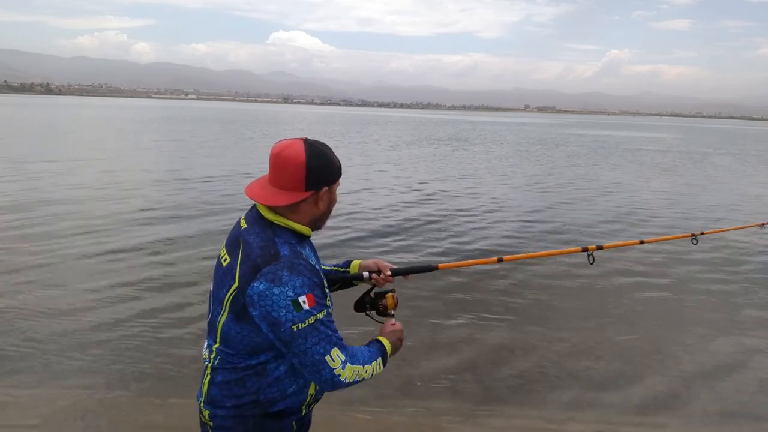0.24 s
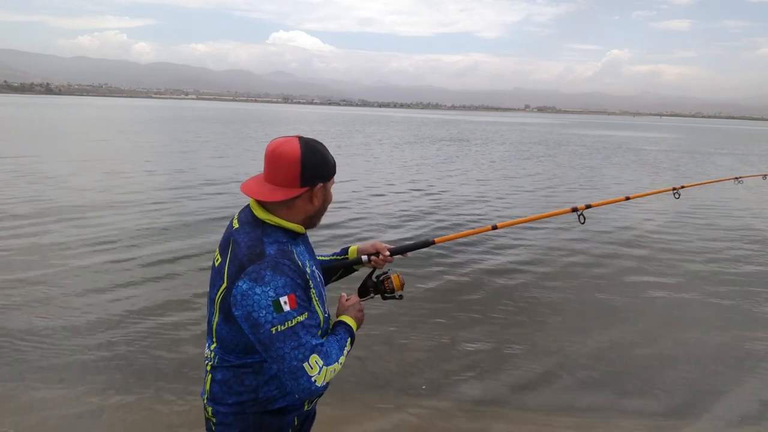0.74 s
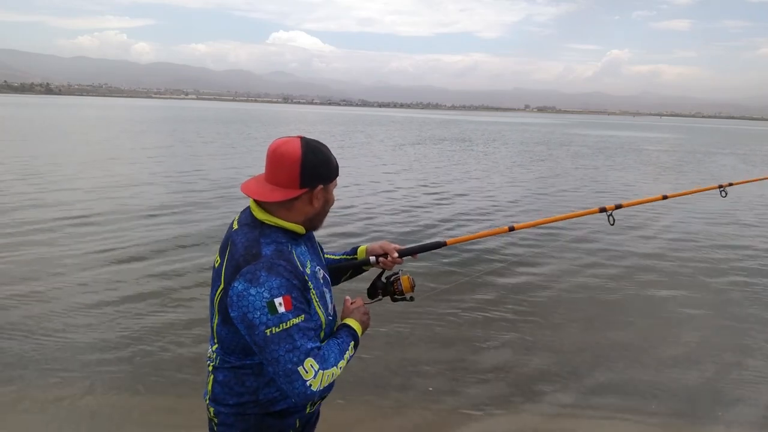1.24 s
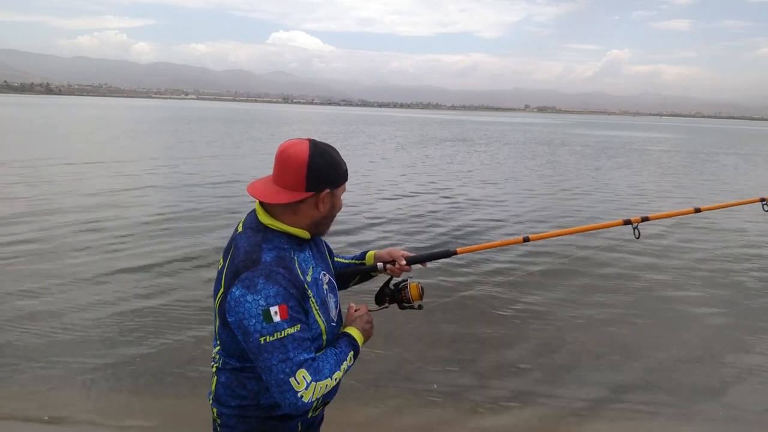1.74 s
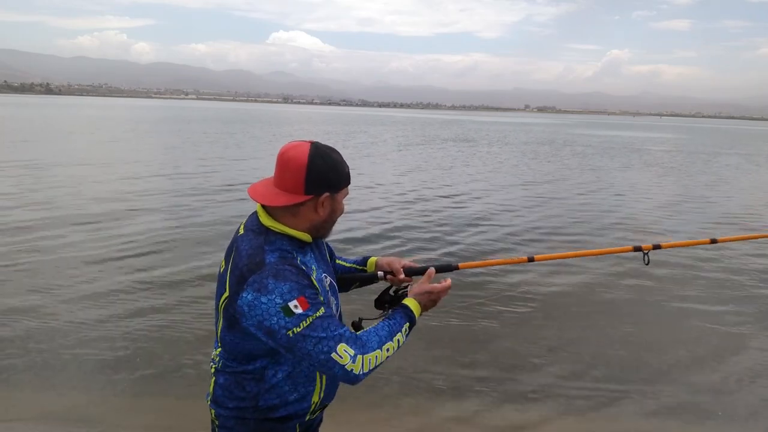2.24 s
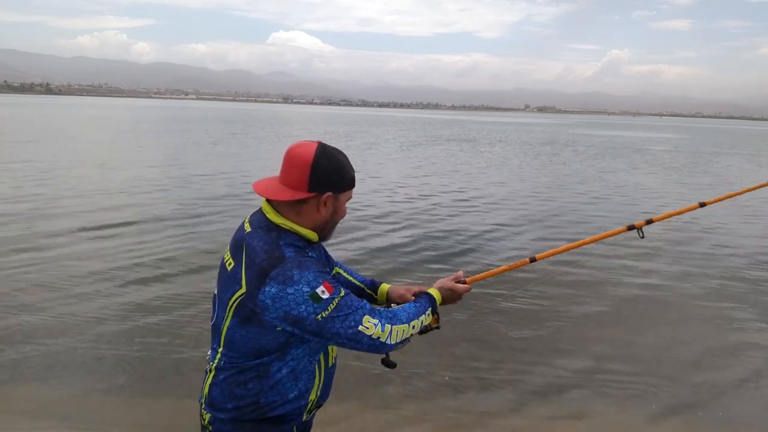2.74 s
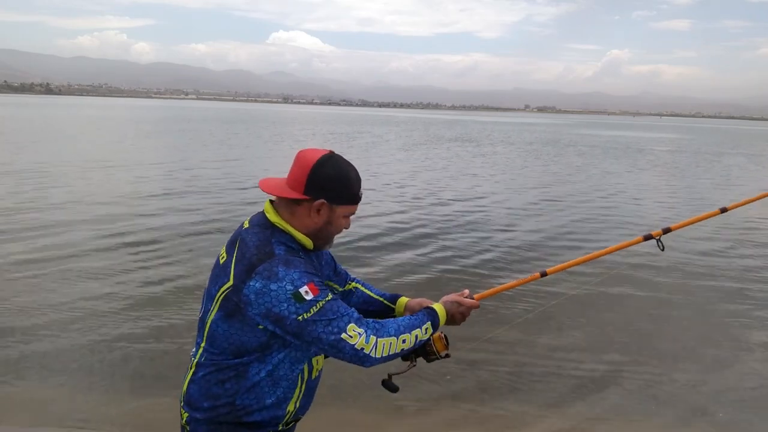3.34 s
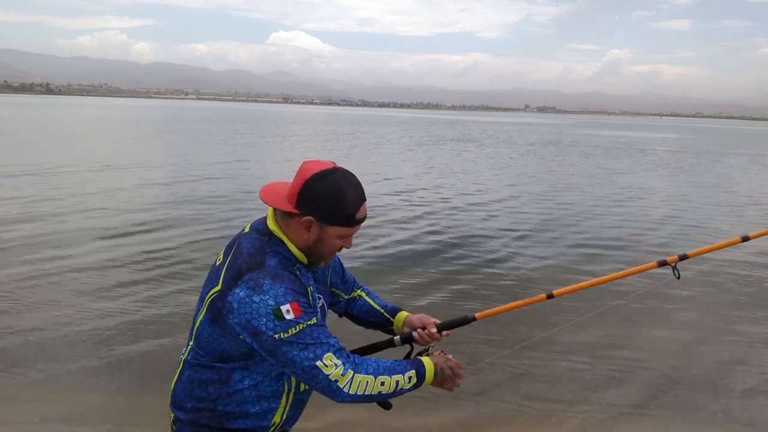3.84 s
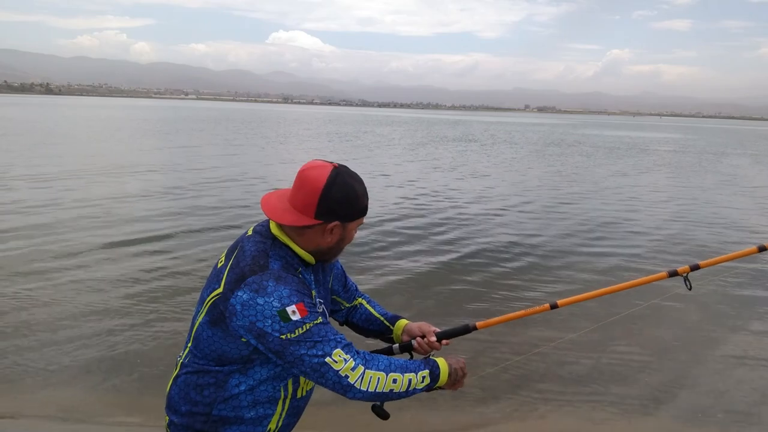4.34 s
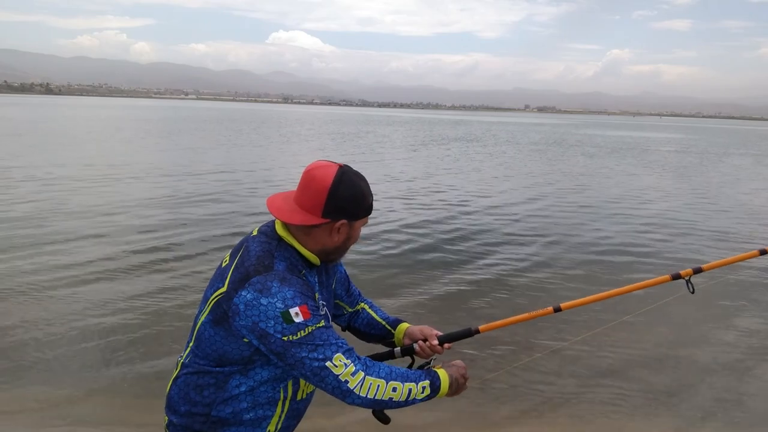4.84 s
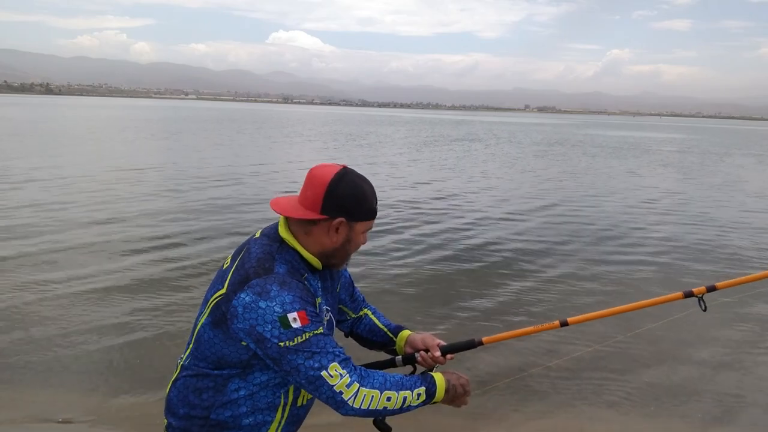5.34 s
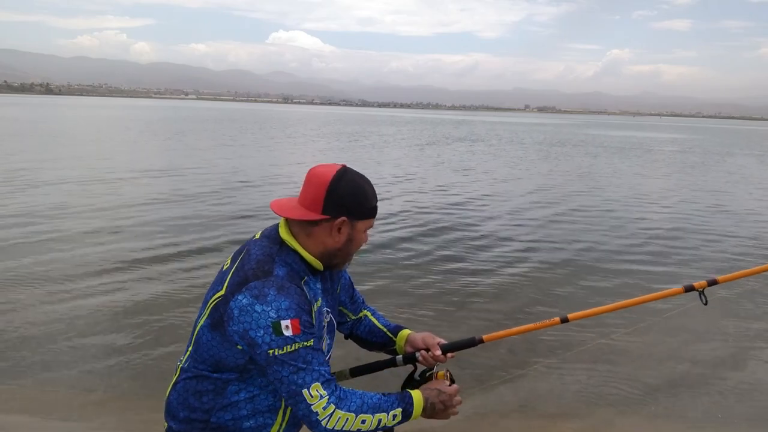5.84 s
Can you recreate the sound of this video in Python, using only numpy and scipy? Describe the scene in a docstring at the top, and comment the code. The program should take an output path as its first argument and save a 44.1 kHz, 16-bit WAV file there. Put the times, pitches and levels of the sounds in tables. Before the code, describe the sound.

Outdoors at a calm sandy shore, microphone close to the water and an angler. A reedy, hissing whirr of braided line through rod rings pulses and rattles for half a second and stops. Small wavelets then fizz, spit and plop, strongest in the first three seconds, and thin to a dribble. Later a reel ratchet clicks in short quick runs, while low wind thumps bump the microphone.

```python
"""A calm sandy shore, the microphone close to an angler and the water's edge, in light wind.
He winds in for half a second: the ridges of the braided line whirr, hiss and rattle in the rod rings.
Wavelets then fizz, spit and plop on the sand and fade to a dribble: swarms of ringing bubbles, noisy
ticks and gliding hollows. The reel's ratchet clicks in three short runs of struck, damped tones.
Wind is low noise with short thumps on the microphone, over the steady noise of distant water and open air."""
import sys
import numpy as np
from scipy import signal
from scipy.fft import rfft, irfft, next_fast_len
from scipy.io import wavfile
from scipy.ndimage import uniform_filter1d, map_coordinates

SR = 44100
rng = np.random.default_rng(int(sys.argv[2]) if len(sys.argv) > 2 else 0)


def persist_wave(psi):
    """Save psi, clipped to +-1, as 16-bit WAV."""
    counts = np.round(np.clip(psi, -1, 1) * 32767).astype(np.int16)
    wavfile.write(sys.argv[1], SR, np.atleast_2d(counts).T)


N = 268252  # length in samples

# spectrum of bubbles bursting at the water's edge: freq_hz, gain_db
SHORE_SPECTRUM = [(150, -42), (250, -11), (400, -29.5), (680, -14.5), (988, -4), (1330, 2.5), (2240, -4.5),
                  (5730, -7.5), (9660, -13.5), (16000, -21.5)]
WINDING_STOP_S, SLACK_S = .49, 0.57  # the winding ends, then the line goes slack


def amp(db):
    """Decibels to gain."""
    return 10 ** (np.asarray(db) / 20)


def unit(x):
    """Scale to rms 1."""
    return x / np.sqrt(np.mean(x ** 2) + 1e-20)


def curves(rows):
    """One value per sample for each column after the time."""
    s, *cols = np.transpose(rows)
    return [np.interp(np.arange(N) / SR, s, c) for c in cols]


def wobble(rate):
    """A smooth random curve, rate knots a second."""
    knots = rng.standard_normal(int(N * rate / SR) + 4)
    return map_coordinates(knots, [np.arange(N) * rate / SR])


def filtered(x, response):
    """x times a response of frequency."""
    m = next_fast_len(len(x) + 8192)  # padded so that the end does not wrap into the start
    return irfft(rfft(x, m) * response(np.fft.rfftfreq(m, 1 / SR)), m)[:len(x)]


def colour(x, points):
    """Shape x with (freq_hz, gain_db) points on a log frequency axis."""
    f, db = np.transpose(points)
    return filtered(x, lambda hz: amp(np.interp(np.log(hz + 1), np.log(f), db)))


def band(x, lo_hz, hi_hz, order=2):
    """Causal band-pass."""
    sos = signal.butter(order, [lo_hz, min(hi_hz, .49 * SR)], "band", fs=SR, output="sos")
    return signal.sosfilt(sos, x)


def add(track, s, sound):
    """Mix a sound into the track at time s."""
    part = track[max(round(s * SR), 0):][:len(sound)]
    part += sound[:len(part)]


def patchy(x, depth_db):
    """Random gain in clusters a few hundred Hz wide and a few hundredths of a second long."""
    z = signal.stft(x, nperseg=512)[2]
    rows = np.sqrt(np.arange(z.shape[0])) * 3.5  # patches widen toward the treble
    cols = np.arange(z.shape[1]) / 5
    field = map_coordinates(rng.standard_normal((60, 400)), np.meshgrid(rows, cols, indexing="ij"))
    return signal.istft(z * amp(depth_db * field), nperseg=512)[1][:N]


def bubble(t, hz, cycles, rise):
    """A ringing air pocket swells softly, decays by 1/e in so many cycles and glides by the share rise."""
    age = t * hz / cycles
    phase = cycles * (age + rise * (age - 2 * (1 - np.exp(-age / 2))))
    return np.sin(2 * np.pi * phase) * np.exp(-age) * (1 - np.exp(-3.5 * age))


def winding():
    """Pitch and level of the line: each turn of the slowing rotor tugs it, until the winding stops."""
    # mean speed of the line, as braid ridges passing a ring: time_s, ridge_rate_hz
    line_speed = [(0, 2333), (.12, 2104), (.18, 1598), (.225, 1684), (.275, 1908), (.32, 1622), (.42, 1552),
                  (.46, 1840), (.5, 1468)]
    rotor_hz, slowing_hz_per_s, first_pull_s = 16.2, 8.8, 0.005
    pull_share = 0.0964  # swing of speed within a turn
    line_db, stop_db_per_s = -43.5, 163
    t = np.arange(N) / SR
    (mean_hz,) = curves(line_speed)
    age = t - first_pull_s
    pull = np.cos(2 * np.pi * (rotor_hz * age - slowing_hz_per_s * age ** 2 / 2))
    level_db = line_db - stop_db_per_s * np.maximum(t - WINDING_STOP_S, 0)
    return mean_hz * (1 + pull_share * pull), level_db


def braid(hz):
    """Ridges strike a ring at an uneven rate; the higher the overtone, the more it smears."""
    # overtones of the passing ridges: harmonic_number, level_db
    overtones = [(1, 8), (2, -5), (3, -5.5), (4, -9)]
    slip_share, flutter_db = 0.0143, 3  # the braid slips unevenly and keeps losing touch with the rings
    speed = 1 + slip_share * wobble(1500) + .008 * wobble(120)
    phase = 2 * np.pi * np.cumsum(hz * speed) / SR
    return sum(amp(level + flutter_db * wobble(109.6)) * np.sin(k * phase) for k, level in overtones)


def fishing_line():
    """Braid ridges whirr through the rings' resonances over a scratchy hiss; the line sticks once."""
    # resonances of the rod rings: freq_hz, gain_db
    ring_spectrum = [(800, -21), (1500, -13), (2150, -3.5), (2650, -9), (3350, 10.5), (3800, -6.5),
                     (4300, 7), (4850, -5.5), (5350, 5), (6600, -3), (7400, -4), (9500, -18.5),
                     (16000, -27)]
    # friction of the line: freq_hz, gain_db
    rasp_spectrum = [(200, -52), (400, -14.5), (650, -25), (1100, -4.5), (2400, -3), (6000, -6.5),
                     (12000, -25), (16000, -39)]
    # the line snatches and rattles in the rings: middle_s, level_db, half_length_s
    snatches = [(0.301, -40, 0.0069), (.381, -39, 0.011), (0.403, -34.5, 0.0087)]
    whirr_db, hiss_db = -1.5, -2.5  # relative to the level of the winding
    catch_s, catch_half_s, catch_hz, catch_db = 0.3913, 0.026, 1014, -43  # it squeaks on a low note

    hz, db = winding()
    t = np.arange(N) / SR
    taut = np.clip((SLACK_S - t) / (SLACK_S - WINDING_STOP_S), 0, 1)
    whirr = unit(colour(taut * braid(hz), ring_spectrum))
    whirr = whirr * np.sqrt(SLACK_S * SR / N)  # about unit level while the line is taut
    scratch = patchy(rng.standard_normal(N), depth_db=3.5) * amp(3.2 * wobble(500))
    hiss = unit(colour(scratch, rasp_spectrum))
    # the whirr drops out for about twice as long as the squeak
    stuck = np.exp(-((t - catch_s - catch_half_s / 2) / (2 * catch_half_s)) ** 8)
    running = amp(db) * (amp(whirr_db) * (1 - stuck) * whirr + amp(hiss_db) * hiss)

    squeak_phase = 2 * np.pi * catch_hz * np.cumsum(1 + .03 * wobble(700)) / SR
    squeak_gate = np.exp(-((t - catch_s) / catch_half_s) ** 8)
    squeak = squeak_gate * amp(2 * wobble(150)) * np.sin(squeak_phase)

    swells = sum(amp(level) * np.exp(-((t - s) / length) ** 2) for s, level, length in snatches)
    rattle = unit(colour(rng.standard_normal(N), ring_spectrum)) * swells
    return running + amp(catch_db) * squeak + rattle


def wind():
    """A low rumble on the microphone; single eddies shake it for a few uneven swings."""
    # rumble, raised by 3.5 dB below: time_s, level_db
    rumble_level = [(0, -66.5), (5, -67.5), (5.4, -62.5), (6.08, -70)]
    # spectrum of the rumble: freq_hz, gain_db
    rumble_spectrum = [(20, -41), (56, 1), (117, -1.5), (242, -19.5), (500, -79)]
    # eddies that hit the microphone: middle_s, level_db, half_length_s
    thumps = [(0.745, -44, 0.015), (0.837, -38, 0.043), (1.389, -47, 0.01), (2.437, -46.5, 0.057),
              (4.89, -43, 0.014), (5.223, -40, 0.011), (5.314, -38.5, 0.026), (5.458, -48.5, 0.035),
              (5.626, -52.5, 0.12)]
    thump_hz = 79.9  # centre pitch of every thump, before the random drift
    (db,) = curves(rumble_level)
    out = amp(db + 3.5) * unit(colour(rng.standard_normal(N), rumble_spectrum))
    t = np.arange(N) / SR
    flutter = 0.2 * unit(band(rng.standard_normal(N), 78, 136.0))
    drift = 1.56 * wobble(60)  # phase in radians
    for s, level_db, length in thumps:
        swell = np.exp(-((t - s) / length) ** 2)
        swing = np.cos(2 * np.pi * thump_hz * (t - s) + drift)
        out = out + amp(level_db) * swell * (swing + flutter)
    return colour(out, [(20, -23), (50, 0)])  # the microphone is deaf to the slowest pressure swings


def open_air():
    """Distant water and open air: steady shaped noise."""
    # spectrum of the background: freq_hz, gain_db
    air_spectrum = [(100, 3.5), (250, 5.5), (500, -1), (1100, -12), (5000, -20), (12000, -17.5),
                    (14000, -24)]
    return amp(-77.0) * unit(colour(rng.standard_normal(N), air_spectrum))


def wavelets():
    """Levels in dB of splash and of spray: all wavelets share one shape, and their powers add."""
    # wavelets that break on the sand: crest_s, running_length_s, splash_db, fine_spray_db
    breakers = [(0.692, 0.07, -73, -72.5), (0.927, 0.12, -67, -71), (1.036, 0.08, -58.5, -69.5),
                (1.141, 0.14, -60.5, -62), (1.579, 0.24, -50.5, -61.5), (1.883, 0.31, -59.5, -57.5),
                (2.035, 0.16, -57.5, -60), (2.29, 0.062, -63, -67), (2.476, 0.2, -61, -57.5),
                (2.72, 0.084, -53, -62), (2.81, 0.055, -45.5, -63.5), (2.915, 0.15, -50, -72.5),
                (3.756, 0.022, -71, -64.5), (3.836, 0.041, -65, -96), (3.982, 0.22, -67, -72),
                (4.324, 0.14, -65, -63.5), (4.503, 0.038, -76, -59), (4.582, 0.19, -57, -58.5),
                (4.878, 0.26, -69.5, -60.5), (5.174, 0.18, -65.5, -62.5), (5.617, 0.15, -72, -68.5),
                (5.801, 0.056, -65.5, -74.5)]
    rise_db_per_s, sag_db_per_s = 299, 25  # a wavelet builds, then runs up the sand
    drain_db_per_s = 213  # added to the sag as it sinks away
    trickle_db, seep_db = -81, -85  # splash and spray between wavelets
    spray_lag_s = 0.0018  # the fine spray follows the splash

    def shape_db(age, length):
        """Rise before the crest, slow sag after it, steep drain at the end of the run."""
        rise = -rise_db_per_s * np.maximum(-age, 0)
        sag = -sag_db_per_s * np.maximum(age, 0)
        return rise + sag - drain_db_per_s * np.maximum(age - length, 0)

    t = np.arange(N) / SR
    splash, spray = amp(trickle_db) ** 2, amp(seep_db) ** 2
    for s, length, splash_db, spray_db in breakers:
        splash = splash + amp(splash_db + shape_db(t - s, length)) ** 2
        spray = spray + amp(spray_db + shape_db(t - s - spray_lag_s, length)) ** 2
    return 10 * np.log10(splash), 10 * np.log10(spray)


def froth(lo_hz, hi_hz, cycles, spread_db, smooth, patchy_db, count, size):
    """A swarm of bubbles between two pitches, on a noise bed of unresolved ones; rms 1."""
    start, pitch, life, strength, glide = rng.random((count, 5)).T[:, :, None]
    hz = lo_hz * (hi_hz / lo_hz) ** pitch
    gain = amp(spread_db * np.minimum(-np.log(1 - strength), 3))  # many weak, a few strong
    can_glide = hi_hz < SR / 8  # the finest spray bursts before it can glide
    rise = 0.082 / cycles * (glide - .4) * can_glide
    grains = gain * bubble(np.arange(size) / SR, hz, cycles * 2 ** (2 * life - 1), rise)
    places = (start * N).astype(int) + np.arange(size)
    swarm = np.bincount(places.ravel(), grains.ravel(), N)[:N]
    bed = band(rng.standard_normal(N), lo_hz, hi_hz, order=4)
    mix = unit(colour(patchy(unit(swarm) + smooth * unit(bed), patchy_db), SHORE_SPECTRUM))
    power = np.abs(uniform_filter1d(mix ** 2, SR // 16))
    return unit(mix / np.sqrt(power + 0.075))  # every stretch holds about as much air


def crackle(count, size):
    """The finest bubbles burst without ringing: a dense patter of broad ticks; rms 1."""
    strengths = amp(13.4 * rng.standard_normal(count).clip(-2, 2))
    ticks = np.bincount(rng.integers(N, size=count), strengths, N)
    envelope = signal.fftconvolve(ticks, np.hanning(2 * size)[size:] ** 2)[:N]
    noise = patchy(envelope * rng.standard_normal(N), depth_db=8)
    return unit(colour(band(noise, 2020, 10000), SHORE_SPECTRUM))


def wash():
    """Weak ripples dribble a few bubbles; stronger wavelets churn up dense froth, gurgle and spray."""
    deep_db, deep_grows_db = -17.5, 2.5  # deep gurgle under the splash; its gain in a dense froth
    crackle_db = -2.5  # bursting ticks over ringing fizz in the spray
    clump_db, clumps_per_s = 3.5, 37  # a thin dribble comes in little spurts
    splash_db, spray_db = wavelets()
    churn = np.clip((splash_db + 67.5) / 14, .03, 1)  # share of dense froth
    dense = froth(761.0, 2986, cycles=4.9, spread_db=4.0, smooth=0.85, patchy_db=4.5, count=10000, size=1000)
    dribble = froth(699.5, 2706, cycles=9.5, spread_db=7, smooth=0.057, patchy_db=8.5, count=1400, size=2000)
    deep = froth(325, 802, cycles=3.5, spread_db=8, smooth=0.11, patchy_db=9.0, count=700, size=1800)
    fizz = froth(2700, 12500, cycles=11, spread_db=5, smooth=.1, patchy_db=6, count=7000, size=500)
    splash = np.sqrt(churn) * dense + np.sqrt(1 - churn) * dribble
    splash = splash + amp(deep_db + deep_grows_db * churn) * deep
    spray = unit(fizz + amp(crackle_db) * crackle(count=1200, size=130))
    spurts = amp(clump_db * (1 - churn) * wobble(clumps_per_s))
    return spurts * (amp(splash_db) * splash + amp(spray_db) * spray)


def gurgles():
    """A hollow in the surface closes: its noisy resonance swells and glides upward."""
    # closing hollows: middle_s, pitch_hz (at the middle, before the random wobble), level_db
    hollows = [(0.04, 432, -62), (0.09, 1273, -58.5), (0.41, 419.5, -61.5), (1.541, 804, -59.5),
               (1.72, 387.6, -58), (1.977, 622, -60), (2.108, 461, -59), (2.241, 2080, -58.5),
               (2.32, 900, -65.5), (2.541, 1149, -52), (2.75, 720, -56), (3.5, 690, -62), (3.65, 950, -64),
               (3.989, 1360, -65.5), (4.046, 1940, -59), (5.009, 1261, -58), (5.28, 700, -63.5),
               (6.02, 786, -66)]
    out, t = np.zeros(N), np.arange(-SR // 12, SR // 12) / SR
    for s, hz, db in hollows:
        pitch = hz * np.exp(2.0 * t + 0.0626 * wobble(412.6)[:len(t)])
        swell = np.exp(-(t / 0.027) ** 2)
        add(out, s + t[0], amp(db) * swell * np.sin(2 * np.pi * np.cumsum(pitch) / SR))
    return out


def plops():
    """Larger pockets of air close and ring low, wavering as the water moves over them."""
    # large bubbles, started 2 % lower and 6.5 dB up below: start_s, level_db, pitch_hz
    pockets = [(0.083, -53, 540), (0.611, -50, 1340), (1.081, -47.5, 1170), (1.131, -37.5, 1027),
               (1.271, -58, 550), (1.619, -51.5, 396), (1.668, -51, 402.6), (2.03, -46, 645),
               (2.196, -53, 586), (2.818, -45.5, 482), (3.463, -54, 634), (4.101, -52, 924),
               (4.406, -44, 1060), (4.573, -55, 417), (5.164, -55.5, 986), (5.819, -50, 1182)]
    out, t = np.zeros(N), np.arange(SR // 8) / SR
    for s, db, hz in pockets:
        wavering_s = np.cumsum(1 + 0.085 * wobble(130)[:len(t)]) / SR  # time runs unevenly
        add(out, s, amp(db + 6.5) * bubble(np.abs(wavering_s), hz * .98, cycles=8.7, rise=0.11))
    return out


def drops():
    """A drop is a short noisy spit with a soft tail of falling droplets, and a small ringing bubble."""
    # loudest drops and bursting bubbles, lowered 6.5 dB below: start_s, level_db, pitch_hz
    loud_drops = [(0.733, -39.5, 3390), (0.8936, -44, 3130), (1.0121, -39.5, 1696), (1.046, -34, 3290),
                  (1.0813, -35, 3600), (1.106, -39.5, 1810), (1.147, -36.5, 1910), (1.211, -29.5, 3360),
                  (1.225, -36.5, 5350), (1.2345, -37, 4630), (1.5712, -33, 2920), (1.7178, -33, 3310),
                  (1.812, -38.5, 1920), (1.936, -46, 2590), (2.4768, -33, 4120), (2.805, -30.5, 1436),
                  (2.852, -26.5, 3330), (2.8596, -28, 1700), (2.861, -32, 5720), (3.052, -31.5, 3480),
                  (3.482, -36.5, 5680), (3.701, -35.5, 5620), (3.7558, -41.5, 4100), (4.1005, -42, 1470),
                  (4.277, -42, 6600), (4.324, -37.5, 6160), (4.403, -38.5, 2670), (4.495, -32.5, 3070),
                  (4.4995, -34, 5220), (4.591, -33, 1700), (5.188, -49.5, 3140), (5.272, -40, 3340),
                  (5.8187, -37, 3200), (5.8543, -41, 2890)]
    out, t = np.zeros(N), np.arange(SR // 12) / SR
    for s, db, hz in loud_drops:
        patter = amp(-9.5 - 60 * t / 0.12 + 1.7 * wobble(560)[:len(t)])
        envelope = amp(-60 * t / 0.012) + patter
        spit = band(rng.standard_normal(len(t)) * envelope, hz * 0.56, hz * 1.39, order=4)
        drop = spit / np.abs(spit).max() + 2.74 * bubble(t, hz, cycles=6.55, rise=0.0049)
        drop = band(drop, hz * 0.19, hz * 1.4, order=3)  # the soft surface rounds off the attack
        add(out, s, amp(db - 6.5) * drop / np.abs(drop).max())
    return out


def spits():
    """A thin film of water snaps: a sharp tick of noise with no ring."""
    # snapping films: start_s, peak_db
    films = [(1.147, -42), (1.213, -37.5), (1.64, -40), (1.813, -40), (2.063, -39.5), (2.087, -45),
             (2.124, -44), (2.143, -37), (2.452, -41), (2.52, -40), (2.589, -37.5), (2.625, -39.5),
             (2.805, -35.5)]
    t60_s, low_hz, high_hz = 0.023, 2070, 6300  # all ticks die alike and share one band
    out, t = np.zeros(N), np.arange(SR // 50) / SR
    for s, db in films:
        tick = band(rng.standard_normal(len(t)) * amp(-60 * t / t60_s), low_hz, high_hz, order=3)
        add(out, s, amp(db) * tick / np.abs(tick).max())
    return out


def reel():
    """The pawl snaps off each ratchet tooth, rings, and strikes again more softly."""
    # teeth slipping as the hand turns the reel: start_s, first_blow_peak_db
    teeth = [(4.5995, -31), (4.6203, -31.5), (4.6415, -31.5), (4.671, -30), (4.888, -32.5), (4.9055, -29.5),
             (4.921, -29.5), (4.9375, -28), (5.2734, -42), (5.3272, -41)]
    # ringing modes of the pawl: freq_hz, level_db, t60_s
    pawl_modes = [(2420, -10, 0.02), (4130, -11, 0.011), (5230, 1.5, 0.0072), (5860, -3, 0.012),
                  (6570, 2.5, 0.0077), (7480, -8, 0.016), (10200, -5, 0.0062), (11760, -4.5, 0.0034)]
    rebound_s, rebound_db = 0.0044, -4.5
    out, t = np.zeros(N), np.arange(SR // 25) / SR
    for s, db in teeth:
        for delay, blow_db in [(0, 0), (rebound_s, rebound_db)]:
            ring = 0
            for hz, level, t60 in pawl_modes:
                decay = amp(level + rng.normal(0, 2.1) - 60 * t / t60)  # no two blows alike
                ring = ring + decay * np.sin(2 * np.pi * (hz * t + rng.random()))
            scrape = .5 * rng.standard_normal(len(t)) * amp(-60 * t / 0.012)
            click = band(ring + scrape, 2680, 22000, order=3)  # so small a part gives no bass
            add(out, s + delay, amp(db + blow_db) * click / np.abs(click).max())
    return out


def scatter(x):
    """A faint, short answer from the beach and the angler's body: a decaying noise tail."""
    t = np.arange(SR // 4) / SR
    tail = band(rng.standard_normal(len(t)), 340, 15800) * amp(-60 * t / 0.36) * (t > .003)
    return signal.fftconvolve(x, tail / np.linalg.norm(tail))[:N]


def scene():
    """Water and tackle close by, over open air and wind."""
    water = wash() + spits() + drops() + plops() + gurgles()
    clicks = reel()
    answer = scatter(amp(-10) * water + amp(-16.5) * clicks)
    return (water + clicks + answer + fishing_line() + wind() + open_air())[None]


def record(dry):
    """The recorder keeps nothing above its band limit."""
    top_hz = 15900
    return np.array([filtered(x, lambda hz: hz < top_hz) for x in dry])


dry = scene()
out = record(dry)
persist_wave(out)
```